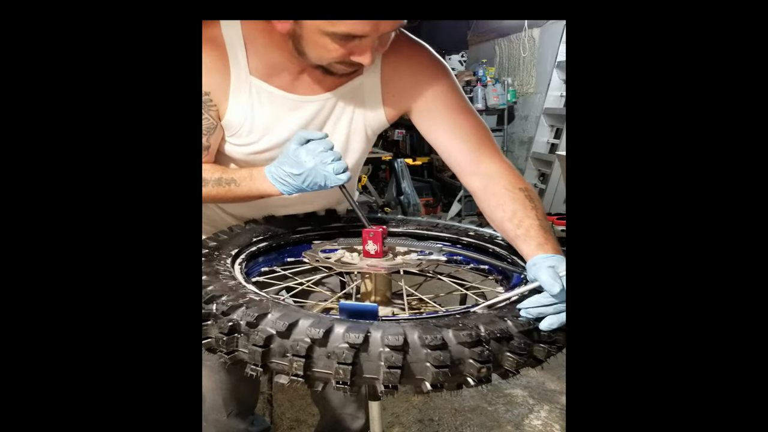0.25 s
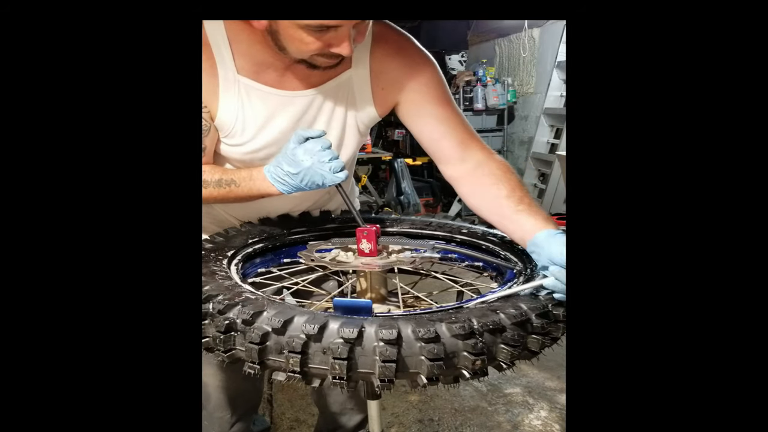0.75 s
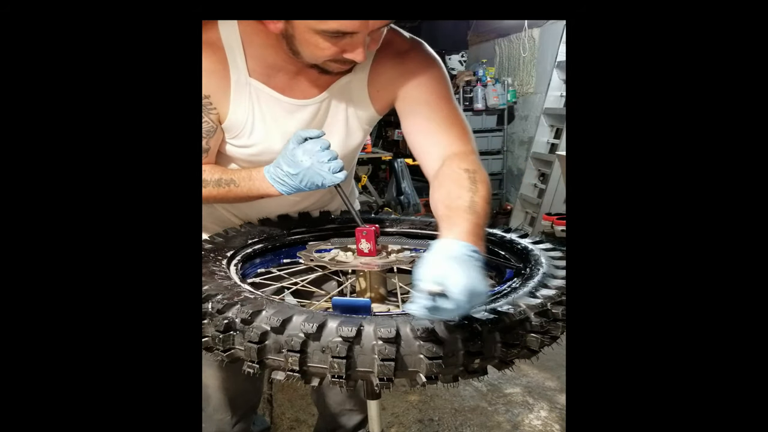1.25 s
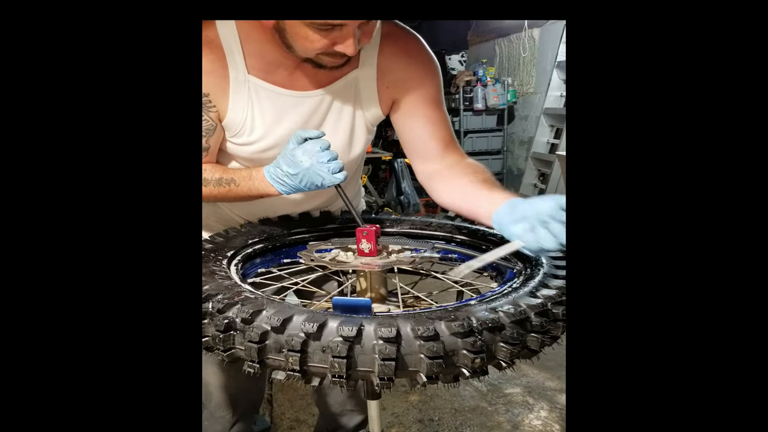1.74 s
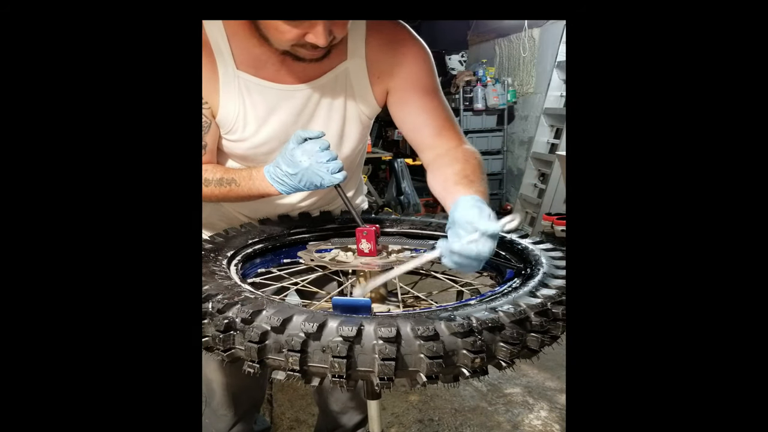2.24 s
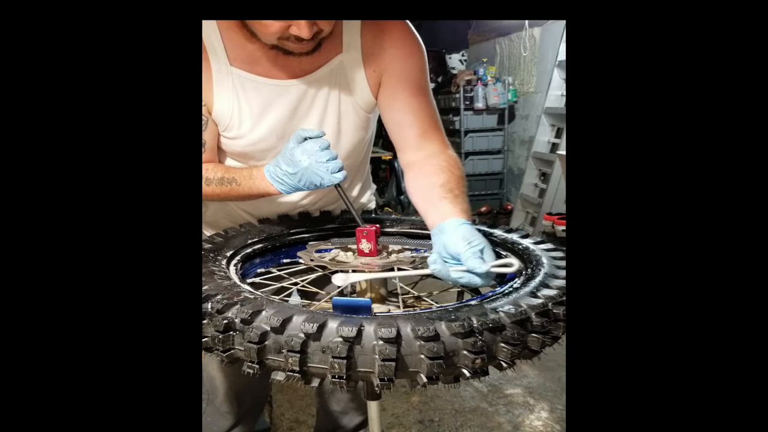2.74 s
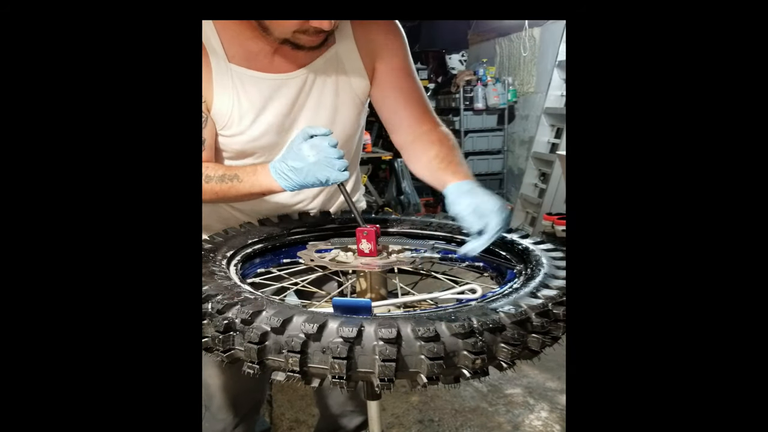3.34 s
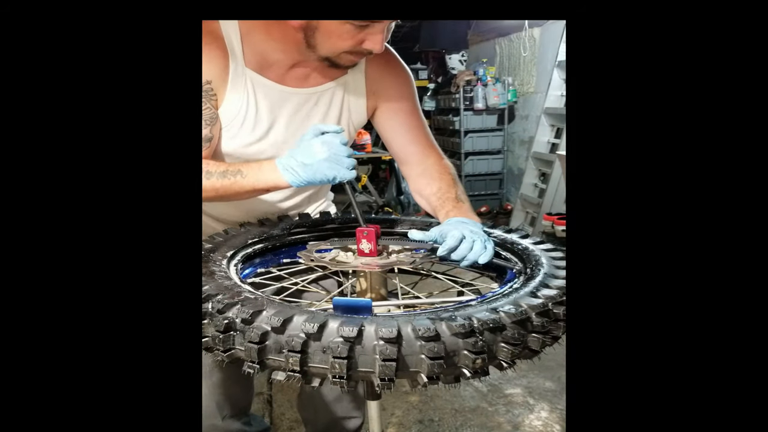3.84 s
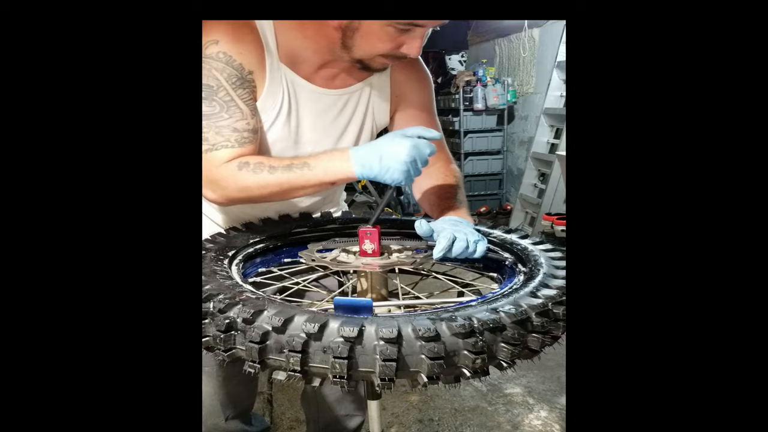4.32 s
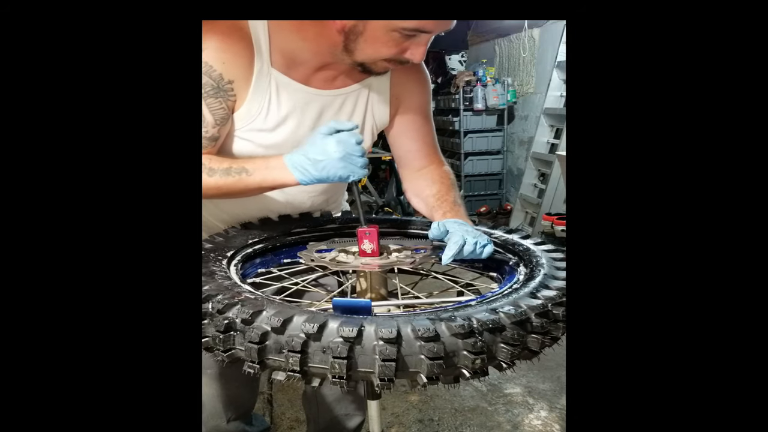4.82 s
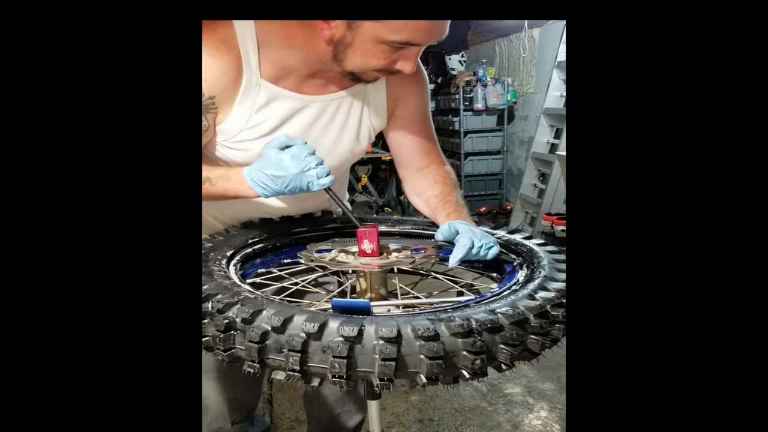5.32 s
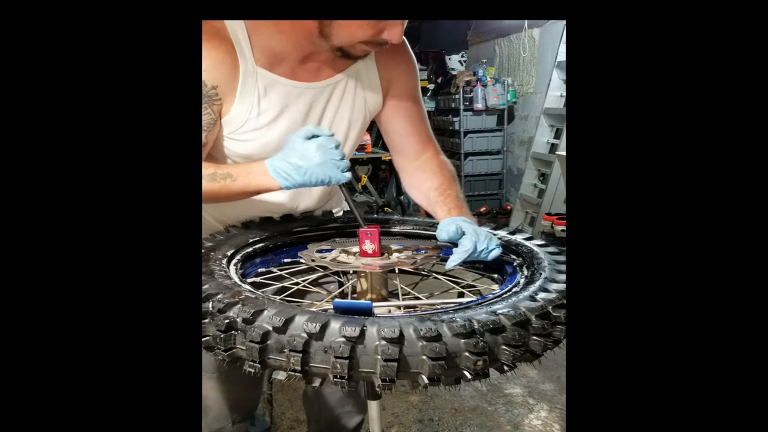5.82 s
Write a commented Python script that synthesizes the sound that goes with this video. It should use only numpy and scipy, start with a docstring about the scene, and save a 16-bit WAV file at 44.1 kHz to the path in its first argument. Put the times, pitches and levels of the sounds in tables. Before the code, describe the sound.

Close in a small garage, over a steady low fan rumble and mains hum, gloved hands brush rubber with faint taps and a soft dull thump. A steel lever slides out, clinks brightly on a brake disc, then is dropped with a loud ringing double clank. A quick run of metallic rattles follows as it is nudged into place, then mostly hum. Phone microphone nearby.

```python
"""Tire lever on a motorcycle wheel

A steel lever is slid out of a spoked wheel, clinks against it, is dropped on it and nudged into place.
Each blow excites decaying modes of lever, brake disc, spoke and rim, plus dense clatter, in a small garage.
Shaped noise makes the glove's brushing, the lever's sliding and a fan's rumble; sines make the mains hum.
The phone's gain control turns everything down after the first loud clink and creeps back late."""
import sys
import numpy as np
from scipy import signal
from scipy.fft import rfft, irfft
from scipy.io import wavfile
from scipy.ndimage import uniform_filter1d, minimum_filter1d

SR = 44100
rng = np.random.default_rng(int(sys.argv[2]) if len(sys.argv) > 2 else 0)


def store_pcm(level_fs):
    """Save levels as 16-bit WAV."""
    pcm = np.round(np.clip(level_fs, -1, 1) * 32767).astype(np.int16)
    wavfile.write(sys.argv[1], SR, np.atleast_2d(pcm).T)


N = 267687
TIME = np.arange(N) / SR
RING_TIME = TIME[:int(SR * .55)]  # time axis of one blow, in seconds


def undb(db):
    """Level law: an amplitude gain is ten to the power of decibels over twenty."""
    return 10 ** (np.asarray(db) / 20)


def unit(x):
    """Normalization: scale to an rms amplitude of 1."""
    return x / np.sqrt(np.mean(x ** 2))


def along(points, hz):
    """Interpolation: read (frequency, value) points on a logarithmic frequency axis."""
    point_hz, value = np.transpose(points)
    return np.interp(np.log(hz + 1), np.log(point_hz), value)


def shape(x, gain):
    """Linear filtering: multiply the spectrum by a gain that depends on frequency."""
    size = x.shape[-1]
    hz = np.arange(size // 2 + 1) * SR / size
    return irfft(rfft(x) * gain(hz), size)


def noise(points, size):
    """Filtered random noise: two independent channels of the given spectrum, joint rms 1."""
    white = rng.standard_normal((2, size))
    return unit(shape(white, lambda hz: undb(along(points, hz))))


def fade(t60_s):
    """Exponential decay: the level falls 60 dB in t60_s."""
    return np.exp(-np.log(1000) * RING_TIME / t60_s)


def add(track, start_s, sound):
    """Superposition: mix a sound into the track at its start time."""
    start = int(start_s * SR)
    track[:, start:start + sound.shape[-1]] += sound[:, :N - start]


# spectrum of the fan and room rumble: pitch_hz, density_db (relative, per Hz)
RUMBLE_SPECTRUM = [(24, -36.5), (31, -20), (38, -5), (50, -11.5), (85, 3.5), (125, -4.5), (150, -7.5),
                   (270, -9), (310, -13), (420, -15), (520, -21.5), (700, -24.5), (940, -20), (1100, -31.5),
                   (1600, -49.5)]
# spectrum of the hiss: pitch_hz, density_db (relative, per Hz)
HISS_SPECTRUM = [(500, -11.5), (1250, 6), (1700, -3), (2100, -1.5), (3000, -8), (4400, -12.5), (5100, -7.5),
                 (5700, -14), (7500, -15), (9200, -68), (11000, -30), (13000, -10.5), (16000, -15.5)]
# likeness of the two ports, for rumble and hiss: pitch_hz, correlation (-1 to 1)
PORT_CORRELATION = [(60, 1), (130, 0.86), (290, 0.82), (640, 0.54), (1410, -0.079), (3100, -0.03),
                    (6820, -0.051), (15000, -0.024)]
# mains and motor tones: pitch_hz, level_db (rms, before the gain control)
HUM_TONES = [(59, -43.5), (119.8, -39.5), (239.8, -44), (259, -48), (338, -60), (479.3, -56.5)]
RUMBLE_DB, HISS_DB = -32.5, -49.5


def fan(waver_rad=0.66):
    """Partial coherence: shared mid and opposed side noise set the likeness; hum phases drift slowly."""
    mid, side = undb(RUMBLE_DB) * noise(RUMBLE_SPECTRUM, N) + undb(HISS_DB) * noise(HISS_SPECTRUM, N)

    def correlation(hz):
        return np.clip(along(PORT_CORRELATION, hz), -1, 1)

    mid = shape(mid, lambda hz: np.sqrt((1 + correlation(hz)) / 2))
    side = shape(side, lambda hz: np.sqrt((1 - correlation(hz)) / 2))
    for pitch_hz, level_db in HUM_TONES:
        drift = unit(shape(rng.standard_normal(N), lambda hz: np.exp(-(hz / 2) ** 2)))
        phase = waver_rad * drift + rng.uniform(0, 2 * np.pi)
        mid = mid + np.sqrt(2) * undb(level_db) * np.sin(2 * np.pi * pitch_hz * TIME + phase)
    return np.array([mid + side, mid - side])


# glove brushing over the tire: center_s, level_db (at the peak, before the room), spread_s
BRUSHES = [(0.436, -55.5, 0.11), (0.654, -46.5, 0.039), (0.882, -54.5, 0.077), (1.125, -57, 0.086),
           (5.42, -61, 0.19), (5.93, -55, 0.023)]
# spectrum of the brushing: pitch_hz, density_db (relative, per Hz)
BRUSH_SPECTRUM = [(500, 0), (1000, 16), (2000, -4), (5000, 4), (9000, -2), (14000, 4.5), (16000, 1.5)]
# loudness of the lever sliding along the rubber: time_s, level_db (before the room)
SLIDE_LEVEL = [(1.68, -66), (1.85, -52), (2.05, -50.5), (2.28, -48.5), (2.45, -34.5), (2.8, -54.5),
               (2.95, -59)]
# spectrum of the sliding: pitch_hz, density_db (relative, per Hz)
SLIDE_SPECTRUM = [(800, 5.5), (2100, 0.5), (3300, -2.5), (5200, 1), (7000, -6.5), (9000, -11.5),
                  (13000, -8), (16000, -5)]


def handling():
    """Friction noise: the glove brushes the tire in smooth swells and the lever slides over the rubber."""
    touch = np.zeros(N)
    for center_s, level_db, spread_s in BRUSHES:
        touch += undb(level_db) * np.exp(-((TIME - center_s) / spread_s) ** 2 / 2)
    slide = undb(np.interp(TIME, *np.transpose(SLIDE_LEVEL), left=-120, right=-120))
    return touch * noise(BRUSH_SPECTRUM, N) + slide * noise(SLIDE_SPECTRUM, N)


# soft knocks on the tire: center_s, level_db (of the envelope peak), pitch_hz, spread_s
THUMPS = [(1.421, -17, 98, 0.0063), (1.424, -21, 187, 0.0053), (1.556, -26.5, 223, 0.0058)]


def thumps():
    """Heavy damping: a knocked tire gives only a few swings, here a sine in a Gaussian envelope."""
    total = np.zeros(N)
    for center_s, level_db, pitch_hz, spread_s in THUMPS:
        envelope = undb(level_db) * np.exp(-((TIME - center_s) / spread_s) ** 2 / 2)
        total += envelope * np.sin(2 * np.pi * pitch_hz * (center_s - TIME))
    return total


def ring(modes, skirt_hz=55, skirt_t60_s=0.22, buzz_share=.5):
    """Modal synthesis: decaying sines, phased apart at each port, with a skirt of contact buzz around each."""
    mode_hz, level_db, t60_s = np.transpose(modes)[:, :, None]
    amplitude = undb(level_db)
    phase = rng.uniform(0, 2 * np.pi, mode_hz.shape) + rng.uniform(0, np.pi, (2,) + mode_hz.shape)
    swings = np.sin(2 * np.pi * mode_hz * RING_TIME + phase)
    clean = np.sum(amplitude * fade(t60_s) * swings, axis=1) / np.sqrt(np.sum(amplitude ** 2) / 2)

    def skirts(hz):
        resonance = 1 + ((hz - mode_hz) / skirt_hz) ** 2
        return np.sqrt(np.sum(amplitude ** 2 / resonance ** 2, axis=0))

    buzz = shape(rng.standard_normal((2, len(RING_TIME))), skirts)
    return clean + buzz_share * unit(buzz) * fade(skirt_t60_s)


# spectrum of the wheel's many close modes, before contact tilt: pitch_hz, density_db (relative, per Hz)
CLATTER_SPECTRUM = [(150, -18), (450, -5.5), (650, -11.5), (850, -1), (1250, 0), (1480, -5.5), (2100, 2.5),
                    (3300, -2), (4700, -5), (5400, -6), (7300, -5), (8600, -13), (11500, -10.5),
                    (15500, -11)]
CLATTER_T60_S, CLATTER_TOP_T60_S = .26, 0.16


def clatter(tilt_db, split_hz=4500, pivot_hz=1000, grain_db=2.5, grain_hz=160):
    """High modal density: merged modes act as noise, each contact favours clusters, treble dies first."""
    cluster_hz = np.arange(0, SR / 2, 110)
    favour_db = 4.2 * rng.standard_normal(len(cluster_hz))

    def contact_gain(hz):
        return undb(np.interp(hz, cluster_hz, favour_db) + tilt_db * np.log2(1 + hz / pivot_hz))

    dense = shape(noise(CLATTER_SPECTRUM, len(RING_TIME)), contact_gain)
    # tiny rebounds make the level uneven
    rebounds = unit(shape(rng.standard_normal(len(RING_TIME)), lambda hz: np.exp(-(hz / grain_hz) ** 2)))
    dense = unit(dense * undb(grain_db * rebounds))
    low = shape(dense, lambda hz: 1 / (1 + (hz / split_hz) ** 4))
    return low * fade(CLATTER_T60_S) + (dense - low) * fade(CLATTER_TOP_T60_S)


# blows of the lever, worked loose, slid under the disc, dropped, then nudged into place:
# start_s, strength_db, tilt_db (contact tilt per octave), place (a key of CONTACTS)
BLOWS = [(0.648, -40, -22, "tire"), (0.874, -47, -4, "tire"), (1.114, -47, -7, "tire"),
         (1.403, -42, -3.5, "flat"), (1.534, -48, 0, "rim"), (1.55, -41, -11, "tire"),
         (2.303, -33, -4, "spoke"), (2.397, -14, 5.5, "disc"), (2.428, -22, 3, "disc"),
         (2.596, -39, -2, "disc"), (2.929, -14.5, -1.5, "flat"), (2.936, -9.5, 3, "flat"),
         (2.964, -16, -2, "rim"), (2.984, -21, -2.5, "flat"), (3.112, -42, -7, "disc"),
         (3.576, -27, -3.5, "rim"), (3.618, -24, 4.5, "rim"), (3.659, -20.5, -.8, "rim"),
         (3.689, -18, 1, "rim"), (3.71, -19, .3, "flat"), (3.828, -32, -2.5, "rim"),
         (3.886, -41.5, -6, "rim"), (5.961, -51, -3, "rim")]
# how a blow is shared out, by place ("flat": let go, so the lever itself rings freely):
# lever_db, disc_db, spoke_db, rim_db (against the clatter, before build-up and room), chatter_s
CONTACTS = {"disc": (-6, 1, -28, -26, .005), "spoke": (-7, -14, 2, -18, .0012),
            "rim": (-12.5, -18, -18, -6.5, .005), "flat": (-.5, -26, -14, -9, .004),
            "tire": (-22, -14, -22, -14, .007)}
# modes of the steel lever: pitch_hz, level_db (relative), t60_s
LEVER_MODES = [(5126, -7, .3), (7153, -7, .23), (7482, -3, .2), (8280, -20, .25), (9136, -11, .23),
               (10260, 2.5, .15), (10303, -5, .17), (10738, -10, .24), (12988, -8, .18), (13345, -8, .22),
               (14838, -4, .17), (15652, -4, .19)]
# modes of the brake disc: pitch_hz, level_db (relative), t60_s
DISC_MODES = [(991, .5, .36), (1740, -7, .25), (2099, -11, .27), (2239, 0, .2), (2301, -12, .22),
              (3151, -11, .22), (3205, -10, .3), (3705, -12, .3), (4528, -9.5, .3), (5108, -15, .24),
              (6230, -16, .25), (6602, -14, .2), (6948, -12, .2), (7475, 0, .22), (11171, -15, .2),
              (12234, -14, .2), (14808, -10, .18), (15641, -7, .2)]
# modes of a spoke: pitch_hz, level_db (relative), t60_s
SPOKE_MODES = [(980, 1, .18), (2769, 0, .18), (2830, 0, .18), (4205, 2, .18), (5166, -5, .17),
               (5227, -2, .17), (7136, -7, .17), (7486, -7, .17)]
# modes of the rim: pitch_hz, level_db (relative), t60_s
RIM_MODES = [(835, -3, .2), (985, -4, .26), (1199, -3, .2), (1300, -4, .16), (1720, -3, .26),
             (1785, 1, .22), (1850, -2, .22), (2025, -3, .3), (2086, 0, .3), (2305, -2, .22),
             (2381, -2, .25), (2870, -5, .2), (3180, -1, .24), (3430, -7, .3), (3528, -6, .2)]
BUILD_SHARE, BUILD_S = 0.63, .025


def blows(knee_hz=5000, softness=3.4):
    """Impact excitation: chatter feeds the ring briefly; soft contacts weaken high modes. Tones, clatter."""
    tones, rattle = np.zeros((2, 2, N))
    # a held tone grows for a moment as the first reflections join it
    build = 1 + BUILD_SHARE * (1 - np.exp(-RING_TIME / BUILD_S))
    end_fade = np.minimum(1, 10 * (RING_TIME[-1] - RING_TIME))
    for start_s, strength_db, tilt_db, place in BLOWS:
        lever_db, disc_db, spoke_db, rim_db, chatter_s = CONTACTS[place]
        modes = undb(lever_db) * ring(LEVER_MODES) + undb(disc_db) * ring(DISC_MODES)
        modes = modes + undb(spoke_db) * ring(SPOKE_MODES) + undb(rim_db) * ring(RIM_MODES)
        soft_db = softness * min(tilt_db, 0)  # per octave above the knee
        modes = shape(modes, lambda hz: undb(soft_db * np.log2(np.maximum(hz / knee_hz, 1))))
        swell = undb(strength_db) * (1 - np.exp(-2 * RING_TIME / chatter_s)) * end_fade
        add(tones, start_s, modes * swell * build)
        add(rattle, start_s, clatter(tilt_db) * swell)
    return tones, rattle


# left minus right for sounds at the wheel: pitch_hz, difference_db
WHEEL_PAN = [(700, -1.5), (2400, 2), (4400, 0.5), (7300, 4.5), (8400, 12), (9800, 6), (10700, 8.5),
             (15000, 4)]
ROOM_T60_S, ROOM_DB, RING_ROOM_DB = 0.21, 0, -12.5


def garage(x, room_db, first_wall_s=0.0024):
    """Reverberation: direct sound plus dense decaying reflections; the treble favours the left port."""
    onset = 1 - np.exp(-RING_TIME / first_wall_s)
    tail = rng.standard_normal((2, len(RING_TIME))) * fade(ROOM_T60_S) * onset
    tail /= np.sqrt(np.sum(tail ** 2, axis=1, keepdims=True))
    heard = x + undb(room_db) * signal.fftconvolve(x, tail, axes=1)[:, :N]
    sides = np.array([[1], [-1]])
    return shape(heard, lambda hz: undb(sides * along(WHEEL_PAN, hz) / 2))


def scene():
    """Superposition: the work at the wheel, in the garage, sums with the fan and the tire's thumps."""
    tones, rattle = blows()
    wheel = garage(tones, RING_ROOM_DB) + garage(rattle + handling(), ROOM_DB)
    return wheel + thumps() + fan()


def gain_control(x, threshold_db=-24, range_db=5.5, hold_s=0.99, release_db_per_s=1.5):
    """Dynamic range compression: loud sound lowers the gain by a limited amount; it holds, then creeps back."""
    power = uniform_filter1d(np.mean(x ** 2, axis=0), int(SR * .06))
    level_db = 10 * np.log10(np.abs(power) + 1e-12)
    want_db = -np.clip(level_db - threshold_db, 0, range_db)
    half = int(hold_s * SR / 2)
    # the origin shifts the window into the past, so each low gain is held
    held_db = minimum_filter1d(want_db, 2 * half + 1, origin=half, mode="nearest")
    creep_db = release_db_per_s * TIME
    return x * undb(np.minimum.accumulate(held_db - creep_db) + creep_db)


TOP_HZ = 15900


def record(dry):
    """Band limiting: the phone rides its gain, clips at full scale and cuts the top steeply."""
    clipped = np.clip(gain_control(dry), -1, 1)
    low_pass = signal.ellip(10, .2, 70, TOP_HZ, fs=SR, output="sos")
    return signal.sosfilt(low_pass, clipped)


dry = scene()
out = record(dry)
store_pcm(out)
```